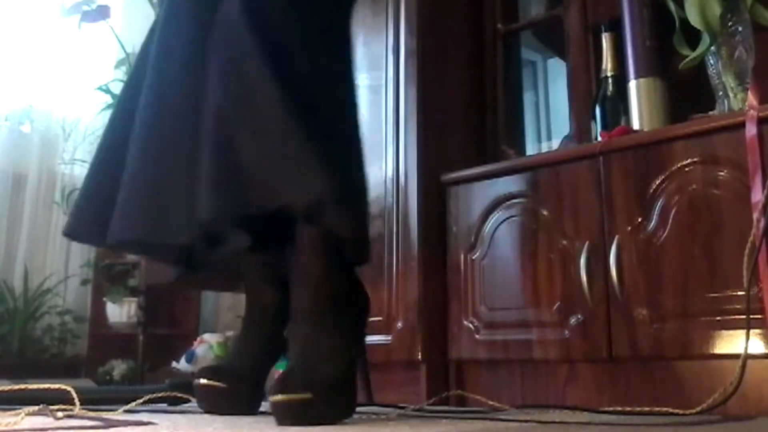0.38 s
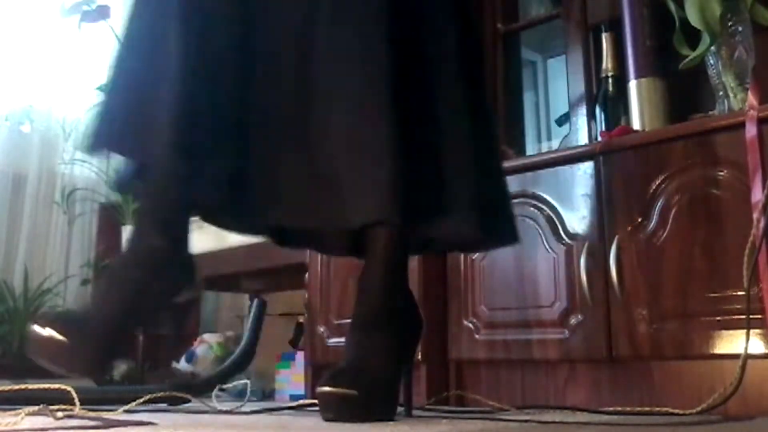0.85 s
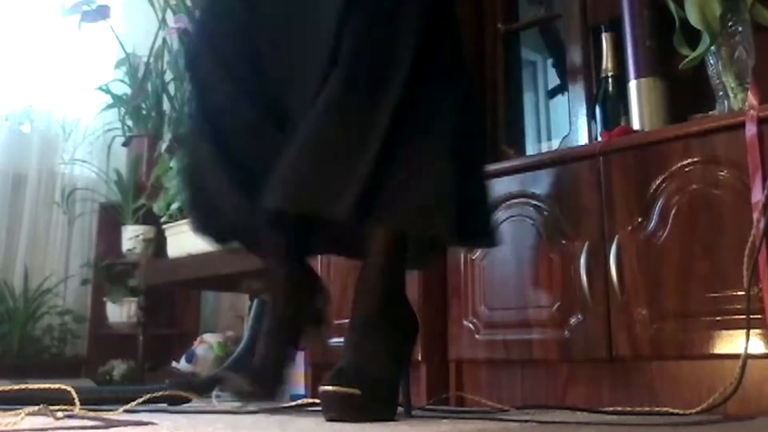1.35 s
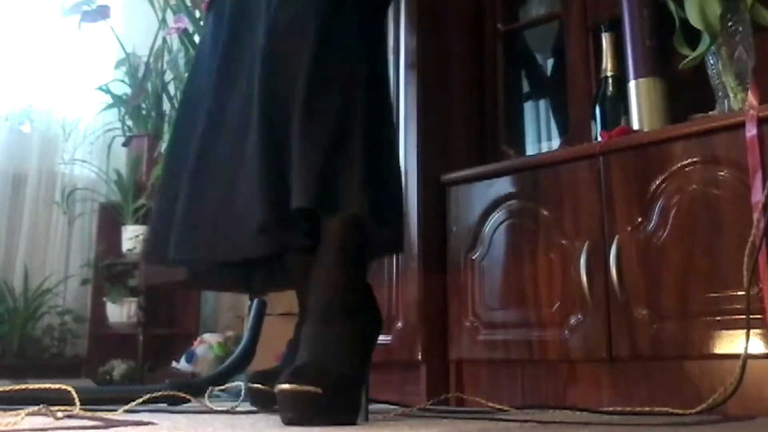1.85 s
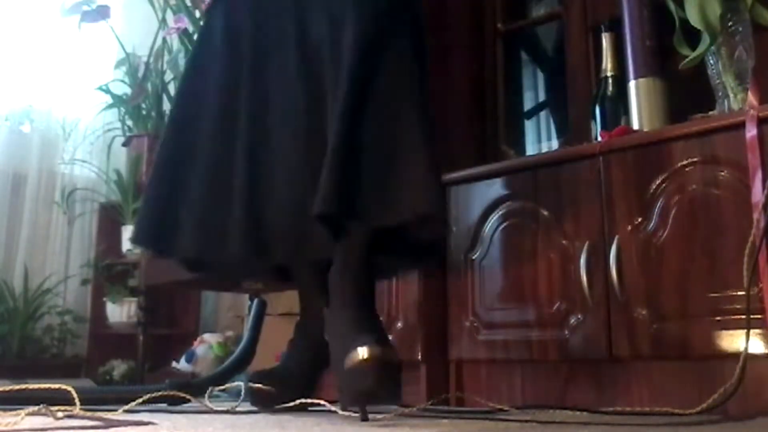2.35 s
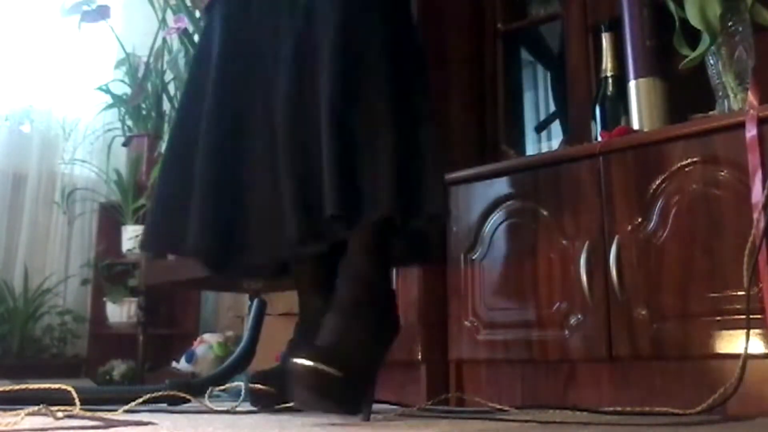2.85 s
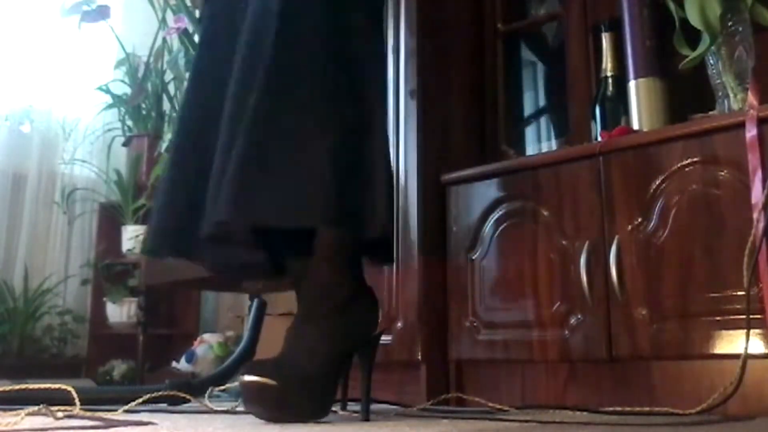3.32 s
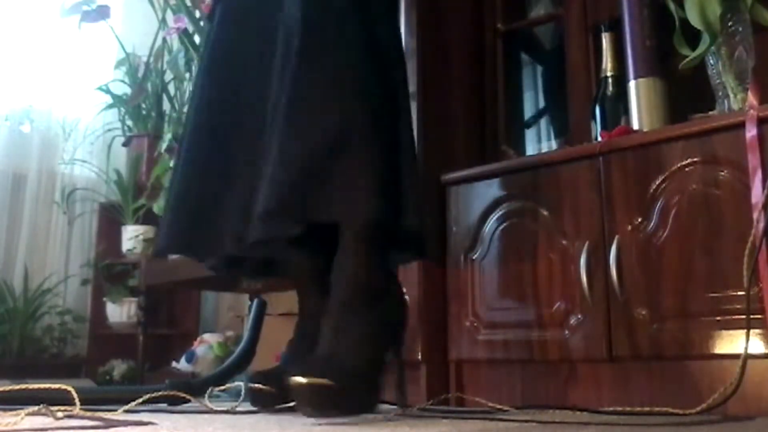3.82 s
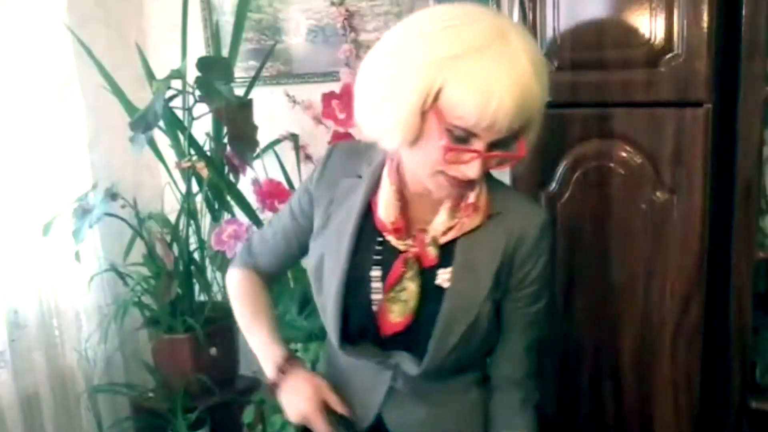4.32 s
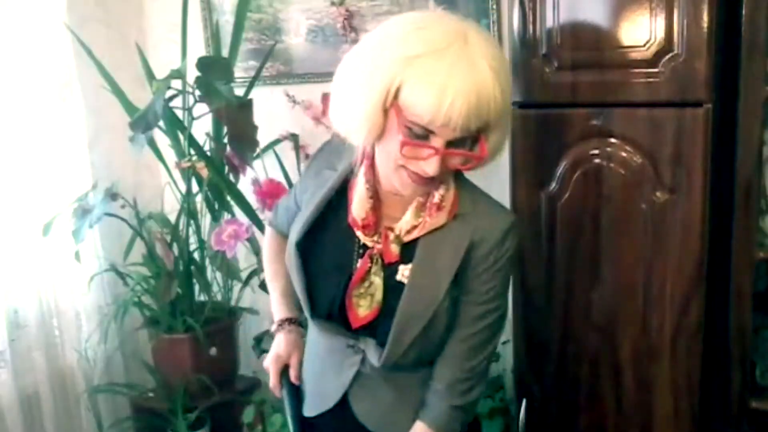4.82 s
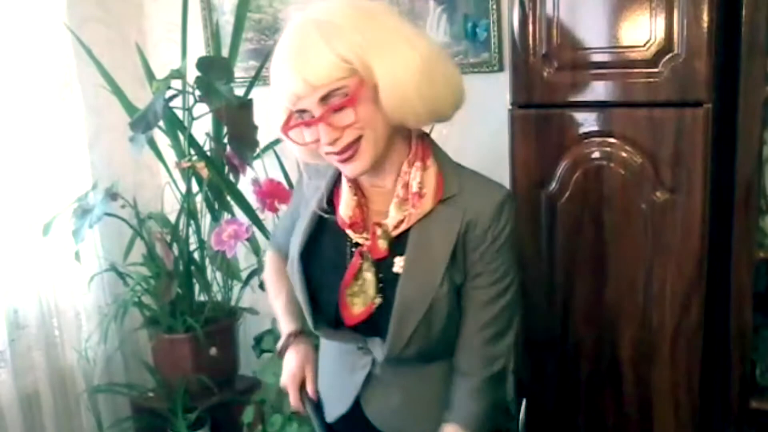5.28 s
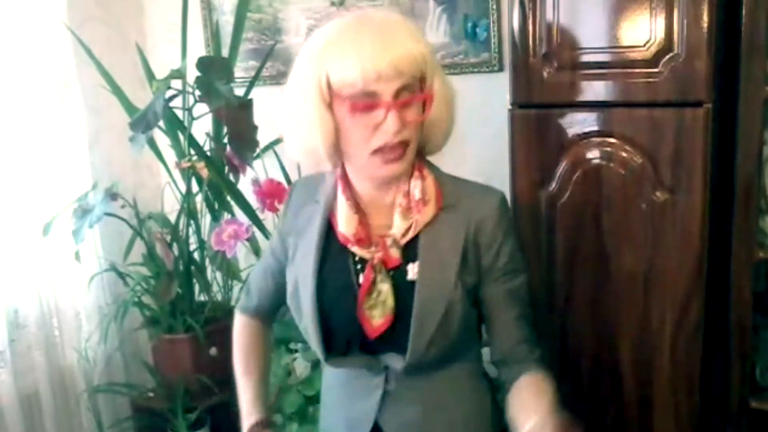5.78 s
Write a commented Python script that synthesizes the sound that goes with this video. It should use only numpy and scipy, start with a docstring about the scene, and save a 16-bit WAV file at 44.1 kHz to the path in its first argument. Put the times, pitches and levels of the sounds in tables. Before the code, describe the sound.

Soft, irregular heel taps and gritty scuffs come first, close to the floor, over low room hiss and rustling skirt fabric. The last heel knock is sharpest. Then the quiet is replaced almost instantly by a loud, constant vacuum cleaner, resonant and breathy, with a fixed mid-high motor tone and faint wavering fan whistle. Short metallic rattles and hose thumps poke through. Small room, short reverberation, plain camera sound.

```python
"""Heels, then a vacuum cleaner

High heels shuffle, scuff and knock on a carpeted floor in a quiet living room: short grainy bursts ring
filters. Tiny bright ticks and rustling cloth come from noise. Then the scene changes to a canister vacuum
cleaner at full speed: filtered noise is the air roaring in hose and room, sine waves are the shaft tone, its
overtones and the thin fan-blade whistle. Now and then the metal wand clinks. One small camera microphone hears
it all."""
import sys
import numpy as np
from scipy import signal
from scipy.fft import rfft, irfft, next_fast_len
from scipy.io import wavfile
from scipy.ndimage import uniform_filter1d

SR = 44100
rng = np.random.default_rng(int(sys.argv[2]) if len(sys.argv) > 2 else 0)


def store_wav(level_fs):
    """Save 16-bit WAV to argv[1]."""
    pcm = np.round(np.clip(np.atleast_2d(level_fs), -1, 1) * 32767)
    wavfile.write(sys.argv[1], SR, pcm.T.astype(np.int16))


def level_to_linear(level):
    """Convert decibel levels to linear amplitude factors, elementwise."""
    exponent = np.asarray(level, float) / 20
    return 10 ** exponent


N = 271656
T = np.arange(N) / SR  # time of each sample, s

# noise colour of the quiet room: (frequency [Hz], relative level per Hz [dB])
ROOM_TONE_COLOUR = [(15, -42), (25, -14), (49, -19), (180, -1), (326, 1.5), (624, -5), (1230, -9.5),
                    (1520, -17.5), (3080, -17), (11900, -24.5), (14800, -27), (16000, -20.5)]
# cloth rustle as the skirt swings: (time [s], level [dB])
RUSTLE_LEVEL = [(0, -67), (.75, -65), (1.0, -96), (1.11, -65), (1.57, -65), (2.53, -70), (2.92, -66.5),
                (3.58, -66.5), (4.05, -75)]
# tiny bright ticks, perhaps jewellery: (time [s], level [dB], ring [Hz])
BRIGHT_TICKS = [(1.682, -59, 8000), (1.697, -55, 12000), (1.712, -57, 12500)]
# heels touching the floor: (time [s], level [dB], ring [Hz], scuff length [s], tick against scuff [dB])
HEEL_STEPS = [(0.121, -52, 1370, 0.0064, 5), (.265, -56, 1310, 0.0093, -7), (0.311, -58, 1280, 0.03, -3),
              (.651, -53.5, 1880, 0.014, -2), (0.701, -50.5, 1000, .004, 0), (0.722, -55.5, 1580, 0.015, 3),
              (0.953, -57, 2000, .012, -10), (.966, -38, 1820, 0.0033, 1), (1.111, -57, 2200, 0.0075, -10),
              (1.266, -58, 800, 0.0088, 3), (1.367, -51.5, 3140, 0.029, 9), (1.384, -43, 564, 0.016, -8),
              (1.453, -53, 1500, 0.012, -2), (1.517, -45.5, 1870, 0.03, 8.5),
              (1.794, -55.5, 1300, 0.0071, 3), (1.917, -63.5, 1190, 0.036, -10),
              (2.085, -47, 1980, 0.012, -4), (2.321, -59, 1310, 0.017, -5), (2.386, -57, 1500, 0.0043, 10),
              (2.47, -48.5, 1820, 0.018, 6), (2.499, -44, 1900, 0.011, 0), (2.508, -38.5, 1450, 0.016, -6),
              (2.542, -51.5, 1670, 0.014, -4), (2.67, -54.5, 1560, 0.014, 4),
              (2.767, -47.5, 1500, 0.0033, 6), (2.815, -51.5, 1940, 0.01, -3), (2.869, -59, 1800, .012, 3),
              (2.968, -45.5, 1480, 0.021, 2), (3.041, -51.5, 1790, 0.018, -9),
              (3.249, -52.5, 2000, .004, 6), (3.303, -54, 1020, 0.018, -8), (3.35, -46, 1480, 0.015, -10),
              (3.51, -58, 1780, 0.0047, 8), (3.547, -54.5, 2700, 0.0093, 4), (3.636, -48.5, 1260, .006, 3),
              (3.695, -42.5, 1420, 0.017, -6), (3.854, -60, 1200, 0.011, 4),
              (3.951, -35.5, 1840, 0.019, 8.5)]
# wand clinks: (time [s], level [dB], rattle length [s], ring against rattle [dB], thump against rattle [dB])
WAND_CLINKS = [(4.66, -29, 0.01, 0, -12), (4.905, -24, 0.027, -5, 2), (5.2, -38, 0.026, -20, 15),
               (5.389, -26.5, 0.018, -21, 4.5), (5.92, -35.5, 0.055, -21, 6.5), (6.103, -25, 0.015, -23, 2)]
# ringing modes of the metal tube: (frequency [Hz], relative level [dB], time to fall by 60 dB [s])
WAND_MODES = [(3800, 5, 0.0064), (7060, -6, .04), (9660, 1, 0.031), (12760, -28, 0.044),
              (14834, -19, 0.027)]
# noise colour of the air roar: (frequency [Hz], relative level per Hz [dB])
ROAR_COLOUR = [(60, -77), (150, -68), (220, -26.5), (300, -13.5), (480, -12.5), (700, -2), (900, -1),
               (1150, -4.5), (1670, -19.5), (4000, -23), (6000, -80)]
# air resonances of hose and room: (frequency [Hz], nominal width [Hz], level before the roar gain [dB])
HOSE_RESONANCES = [(185.6, 17.3, -30), (259.3, 19.6, -27.5), (296, 29, -22), (332.6, 14.7, -20.5),
                   (374.4, 36, -19), (427.2, 16.7, -18), (471.6, 31.5, -9), (495.2, 18.6, -12),
                   (562.3, 31, -12), (623, 23, -9.5), (729, 35, -10), (830.5, 27, -11), (1010.6, 27, -12),
                   (1100, 21, -15), (1167, 77, -12.5), (1324, 60, -13.5)]
# noise colour of the air hiss: (frequency [Hz], relative level per Hz [dB])
HISS_COLOUR = [(880, -30), (1500, 2.5), (2500, -3.5), (3450, 0.5), (4200, -4), (7700, -5.5), (7930, -9.5),
               (8330, -7), (8580, -9.5), (15600, -22)]
# overtones of the shaft tone: (multiple of the shaft frequency [-], level against the shaft tone [dB])
SHAFT_OVERTONES = [(2, -14.5), (3, -16), (5, -27)]
# fan-blade whistle: (time [s], level [dB])
WHISTLE_LEVEL = [(4.12, -43), (4.36, -37.5), (4.65, -40.5), (4.85, -44), (4.95, -38), (5.03, -40),
                 (5.08, -63), (5.13, -46), (5.38, -36), (5.5, -47), (5.86, -46), (5.94, -37), (6.07, -54),
                 (6.16, -43)]

TONE_DB, TONE_SWELL_DB = -57.5, 0.5
RUSTLE_HZ, RUSTLE_WIDTH_HZ = 1500, 2400
CRACKLE_PER_S, CRACKLE_DB = 130, 0  # dB: level of the snaps before filtering
TICK_S, TICK_WIDTH_HZ = 0.005, 2300
CRISP_DB, THUD_DB = -14, -7.5  # hard tip and boards, against the ring
KNOCK_HZ = 930  # a clink also thumps the hose
LOW_CUT_HZ = 160  # the knocks carry little deep bass
ROOM_T60_S, ROOM_DB, ROOM_DULL_HZ = 0.19, -8.5, 3930
ON_S = 4.112  # the scene changes to the vacuum
HUSH_S, RISE_S = 0.056, 0.047  # the quiet room fades out as the scene changes; the vacuum fades in
SURGE_DB = 0.8  # slow wavering shared by roar and hiss
ROAR_DB, HISS_DB = -23.5, -29  # gains; that of the hiss holds at ON_S
HISS_EASES_DB_PER_S = 0.17
# the rotor slows a little as suction loads it
SHAFT_HZ, SAG_HZ, SAG_AT_S, SAG_S = 893.1, 4.3, 4.75, 0.3
SHAFT_DB, SHAFT_WAVER_DB, WHISTLE_WAVER_DB = -30.5, 1, 2.2
BLADES = 9
TOP_HZ = 15780


def level(x, db):
    """Scale to an rms level."""
    return x * level_to_linear(db) / np.sqrt(np.mean(x ** 2))


def unit(x, length_s):
    """Scale a short sound so that its energy equals that of an rms of 1 over its length."""
    return x / np.sqrt(np.sum(x ** 2) / (length_s * SR))


def curve(table):
    """Join the points of a (time, value) table into a value for every sample."""
    s, value = np.transpose(table)
    return np.interp(T, s, value)


def coloured(points):
    """Noise of rms 1, its spectrum shaped by (frequency, dB) points."""
    hz, db = np.transpose(points)
    size = next_fast_len(N)
    f = np.maximum(np.fft.rfftfreq(size, 1 / SR), 1)
    gain = level_to_linear(np.interp(np.log(f), np.log(hz), db))
    noise = irfft(rfft(rng.standard_normal(size)) * gain, size)
    return level(noise[:N], 0)


def ring(x, hz, width_hz):
    """One resonance, gain 1 at the centre."""
    return signal.lfilter(*signal.iirpeak(hz, hz / width_hz, SR), x)


def walk(rate):
    """Random wavering: rate new levels per second, smoothed twice; spread near 1."""
    k = int(SR / rate)
    held = np.repeat(rng.standard_normal(N // k + 1), k)
    return 1.3 * uniform_filter1d(uniform_filter1d(held, k), k)[:N]


def add(track, s, sound):
    """Mix a sound in at time s."""
    i = int(s * SR)
    track[i:i + len(sound)] += sound[:N - i]


def burst(length_s, tick_db, grain_db):
    """A tick, and a grainy rub that swells for a moment and dies away."""
    t = T[:SR // 4]
    grit, roughness = rng.standard_normal((2, len(t)))
    grain = level_to_linear(grain_db * uniform_filter1d(roughness, size=66) * np.sqrt(66))
    rub = grit * grain * (1 - np.exp(-t / 0.003)) * np.exp(-t / length_s)
    push = np.exp(-t / 0.0001)
    tick = 2.2 * push + 0.8 * grit * np.exp(-t / 0.001)
    return rub + level_to_linear(tick_db) * tick


def room_tone():
    """Steady room tone and microphone hiss: coloured noise that wavers slightly."""
    waver_db = TONE_SWELL_DB * walk(3.89) + 0.5 * walk(8.6)
    return level_to_linear(TONE_DB + waver_db) * coloured(ROOM_TONE_COLOUR)


def rustle():
    """Skirt and carpet rub and crackle: smooth noise plus snapping fibres through a broad resonance."""
    chance, strength = rng.random((2, N))
    # sparse fibres snapping, a few much louder than the rest
    snaps = (chance < CRACKLE_PER_S / SR) * level_to_linear(-2.3 * np.log(strength + 1e-9))
    fading = signal.lfilter([1], [1, -np.exp(-1 / (0.0023 * SR))], snaps)
    crackle = fading * rng.standard_normal(N)
    cloth = level(rng.standard_normal(N), 0) + level(crackle, CRACKLE_DB)
    cloth = ring(ring(cloth, RUSTLE_HZ, RUSTLE_WIDTH_HZ), RUSTLE_HZ, RUSTLE_WIDTH_HZ)
    return level_to_linear(curve(RUSTLE_LEVEL) + 2.4 * walk(23.3)) * level(cloth, 0)


def quiet_room():
    """Room tone and rustling, faded out just before the scene changes to the vacuum."""
    hush = np.clip((ON_S - T) / HUSH_S, 0, 1) ** 0.5
    return (room_tone() + rustle()) * hush


def ticks():
    """Something small and hard ticks a few times: short bursts through one high resonance."""
    out = np.zeros(N)
    for s, db, hz in BRIGHT_TICKS:
        tick = ring(burst(TICK_S, tick_db=8, grain_db=8), hz, TICK_WIDTH_HZ)
        add(out, s, level_to_linear(db) * unit(tick, TICK_S))
    return out


def heels():
    """Each contact rings sole and floor around one broad pitch; a hard tip adds treble, the boards a low thud."""
    out = np.zeros(N)
    for s, db, hz, length_s, tick_db in HEEL_STEPS:
        contact = burst(length_s, tick_db, grain_db=3.6)
        body = ring(ring(contact, hz, 2.34 * hz), hz, 0.86 * hz)
        crisp = ring(contact, 4900, 9000)
        thud = ring(ring(contact, 580, 1040), 570, 1300)
        # low-ringing, heavy contacts drive the boards most
        thud_gain = level_to_linear(THUD_DB) * (1000 / hz) ** 0.5
        step = unit(body, length_s)
        step = step + level_to_linear(CRISP_DB) * unit(crisp, length_s)
        step = step + thud_gain * unit(thud, length_s)
        add(out, s, level_to_linear(db) * step)
    return out


def wand():
    """The metal tube rattles in its joint: a bright rub that rings the tube's modes and thumps the hose."""
    out = np.zeros(N)
    for s, db, length_s, ring_db, knock_db in WAND_CLINKS:
        blow = burst(length_s, tick_db=3, grain_db=2)
        rattle = ring(ring(blow, 3500, 9400), 4100, 12500)
        modes = 0
        for hz, mode_db, t60 in WAND_MODES:
            width_hz = np.log(1000) / np.pi / t60  # a narrower resonance rings longer
            modes = modes + level(ring(rattle, hz, width_hz), mode_db)
        knock = ring(ring(blow, KNOCK_HZ, 1200), KNOCK_HZ, 1500)
        clink = unit(rattle, length_s)
        clink = clink + level_to_linear(ring_db) * unit(modes, length_s)
        clink = clink + level_to_linear(knock_db) * unit(knock, length_s)
        add(out, s, level_to_linear(db) * clink)
    return out


def room(x):
    """A small furnished room adds a short tail of fading noise, duller than the direct sound."""
    t = T[:SR // 2]
    build_up = 1 - np.exp(-t / 0.001)
    tail = rng.standard_normal(len(t)) * np.exp(-np.log(1000) * t / ROOM_T60_S) * build_up
    tail = signal.lfilter(*signal.butter(1, ROOM_DULL_HZ, fs=SR), tail)
    tail = tail / np.sqrt(np.sum(tail ** 2))
    return x + level_to_linear(ROOM_DB) * signal.fftconvolve(x, tail)[:N]


def air_roar(surge_db):
    """Turbulent air is broad noise; the air in hose and room rings at many pitches."""
    air = rng.standard_normal(N)
    hose = 0
    for hz, width_hz, db in HOSE_RESONANCES:
        # applied twice, so the valleys between resonances stay dark
        width_hz = 0.98 * width_hz
        hose = hose + level(ring(ring(air, hz, width_hz), hz, width_hz), db)
    gain = level_to_linear(ROAR_DB + surge_db + 0.43 * walk(35))
    return gain * (level_to_linear(-3.5) * coloured(ROAR_COLOUR) + hose)


def air_hiss(surge_db):
    """Rushing air hisses as coloured noise that slowly eases; the nozzle throat lifts one band."""
    throat = ring(ring(rng.standard_normal(N), 3900, 900), 3870, 900)
    gain_db = HISS_DB - HISS_EASES_DB_PER_S * (T - ON_S) + 0.51 * surge_db + 0.96 * walk(25)
    return level_to_linear(gain_db) * (coloured(HISS_COLOUR) + level(throat, -17.5))


def rotor():
    """The rotor's unbalance makes a tone with overtones; nine fan blades whistle at nine times its pitch."""
    shaft_hz = SHAFT_HZ - SAG_HZ / (1 + np.exp((SAG_AT_S - T) / SAG_S))
    turn = 2 * np.pi * np.cumsum(shaft_hz + 0.35 * walk(20)) / SR  # angle, with a slight pitch waver
    tones = np.sin(turn)
    for k, db in SHAFT_OVERTONES:
        tones = tones + level_to_linear(db + 1.9 * walk(5.6)) * np.sin(k * turn)
    shaft = level_to_linear(SHAFT_DB + SHAFT_WAVER_DB * walk(12)) * tones
    whistle = level_to_linear(curve(WHISTLE_LEVEL) + WHISTLE_WAVER_DB * walk(15)) * np.sin(BLADES * turn)
    return np.sqrt(2) * (shaft + whistle)  # a sine of peak sqrt(2) has rms 1


def vacuum():
    """Air roar, hiss and rotor tones fade in quickly together; roar and hiss share one surge."""
    surge_db = SURGE_DB * walk(14)
    rise = np.clip((T - ON_S) / RISE_S, 0, 1)
    return rise * (air_roar(surge_db) + air_hiss(surge_db) + rotor())


def scene():
    """Everything reaches one microphone, copied to both channels."""
    knocks = ticks() + heels() + wand()
    knocks = signal.lfilter(*signal.butter(2, LOW_CUT_HZ, "high", fs=SR), knocks)
    mono = quiet_room() + room(knocks) + vacuum()
    return np.array([mono, mono])


def band_limit(x):
    """A steep low-pass at the top of the band."""
    return signal.sosfilt(signal.butter(12, 16920, fs=SR, output="sos"), x)


def record(dry):
    """The camera cuts the top treble sharply with a steep low-pass filter."""
    steep = signal.ellip(12, 0.2, 80, TOP_HZ, fs=SR, output="sos")
    mix = signal.sosfilt(steep, dry)
    return band_limit(mix)


dry = scene()
out = record(dry)
store_wav(out)
```